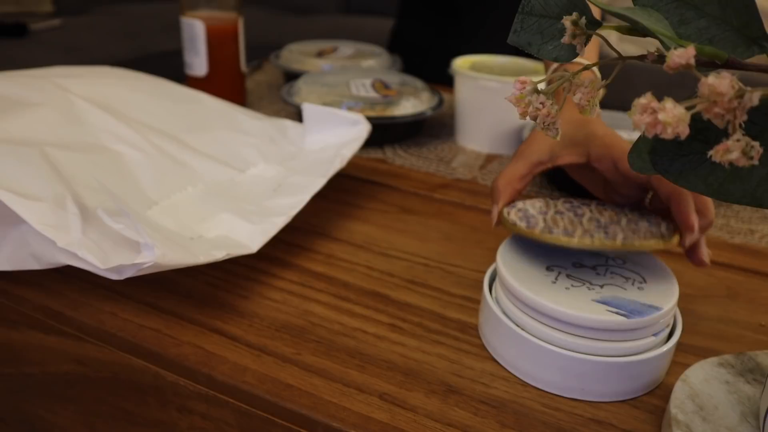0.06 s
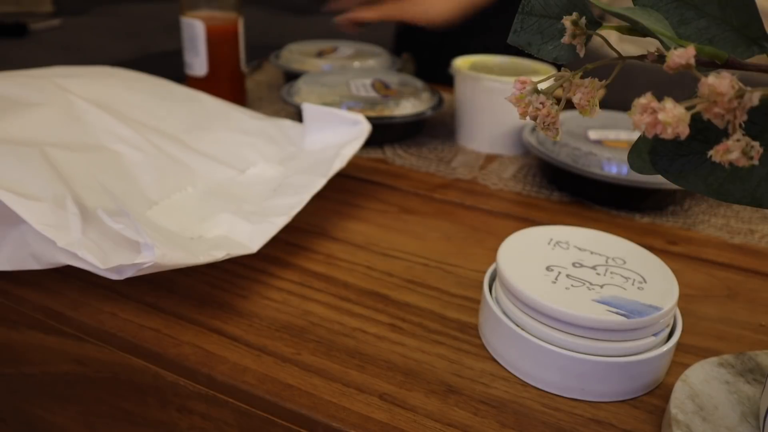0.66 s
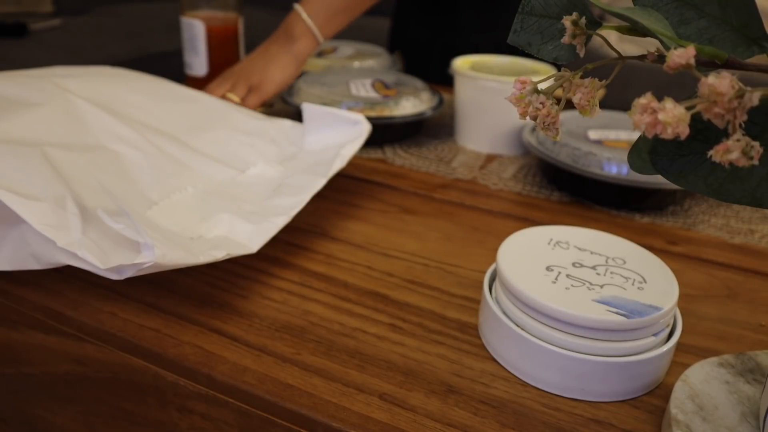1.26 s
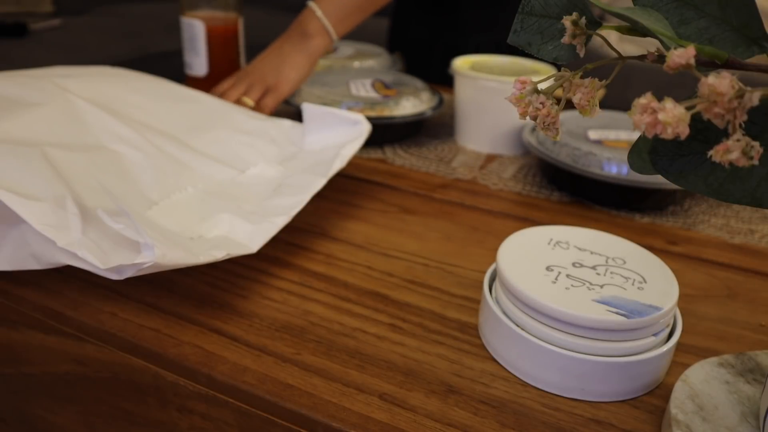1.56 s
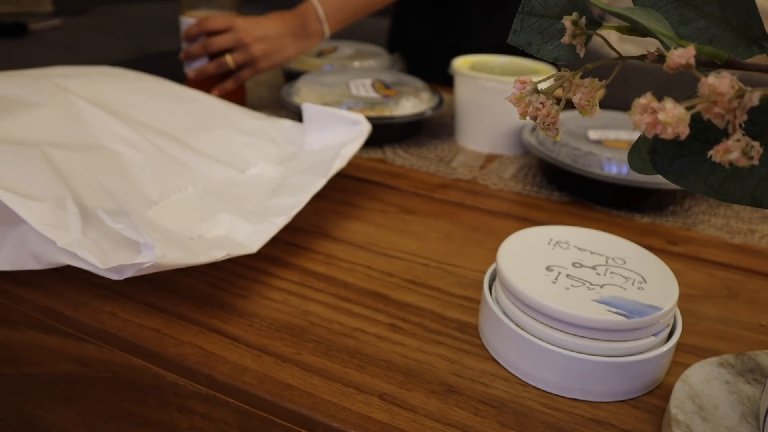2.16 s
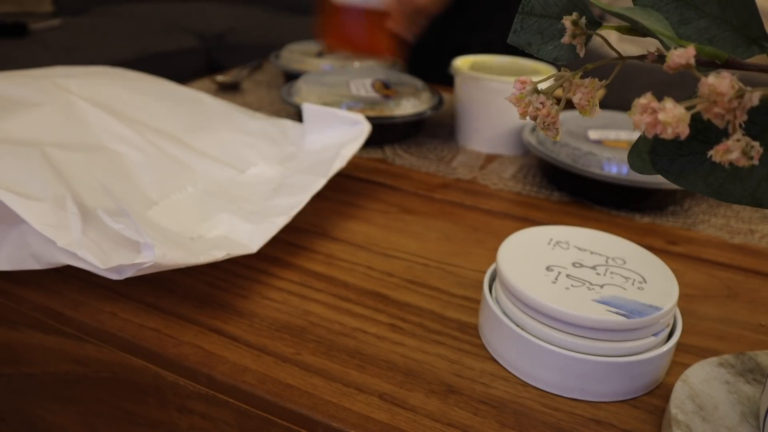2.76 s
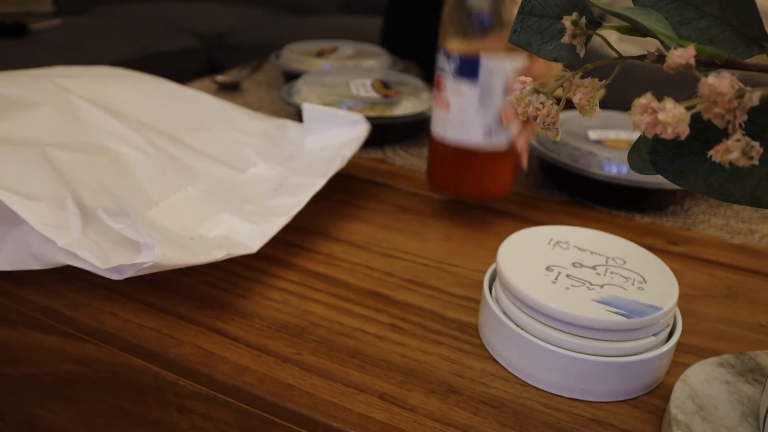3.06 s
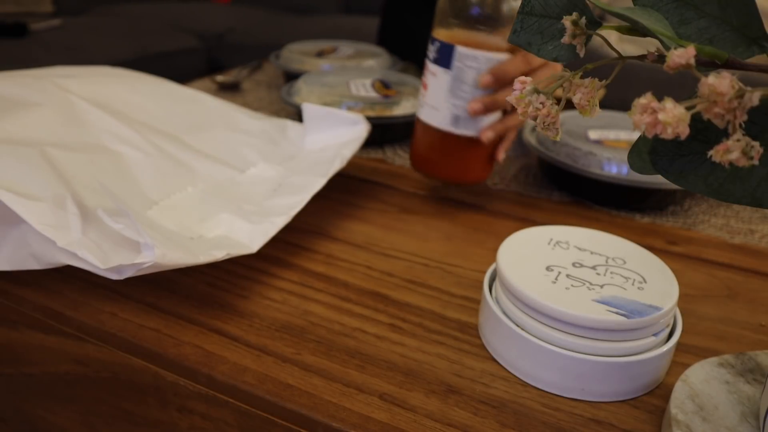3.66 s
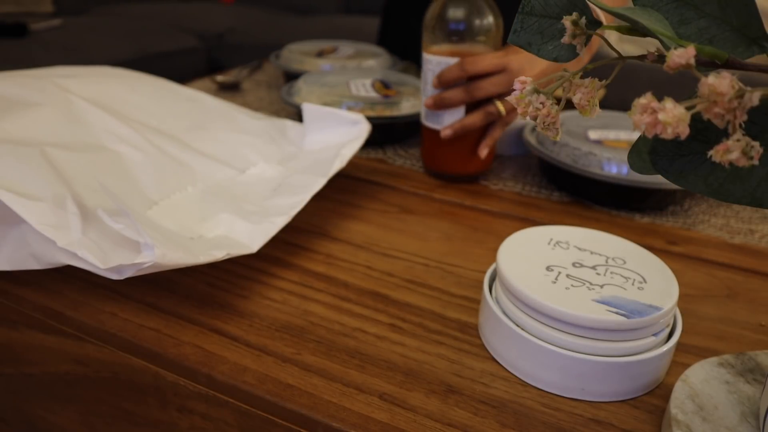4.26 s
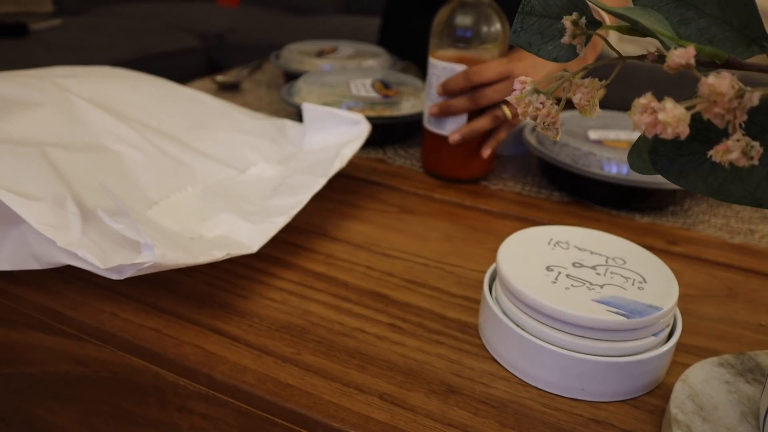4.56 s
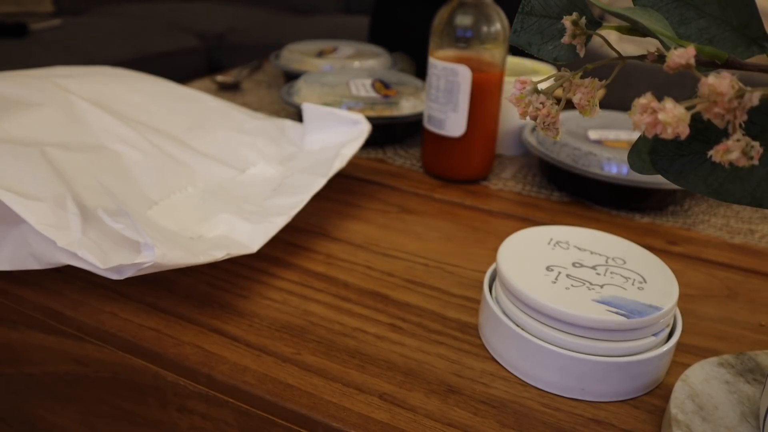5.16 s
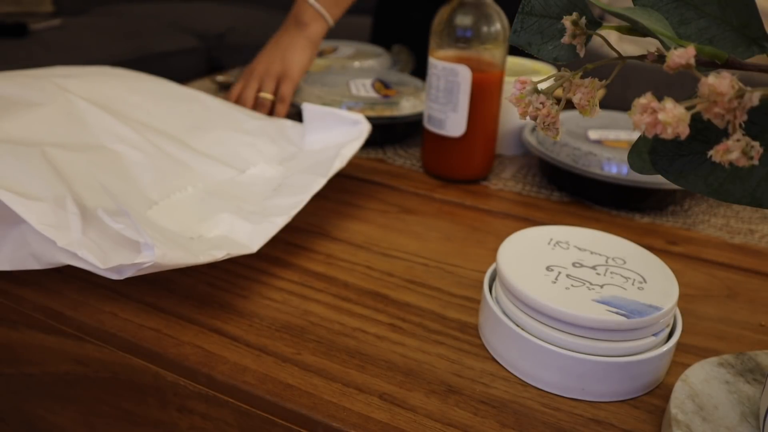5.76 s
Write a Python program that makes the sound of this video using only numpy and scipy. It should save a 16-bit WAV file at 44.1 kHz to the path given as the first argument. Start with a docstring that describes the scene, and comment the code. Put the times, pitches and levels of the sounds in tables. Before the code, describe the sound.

In a quiet room, a ceramic lid clinks and rings briefly, taps a dish, then scrapes and lands on a wooden table with a hard clack. After a pause, a full glass bottle knocks loudly on the bare wood. It is then set on a woven mat with a dull thud and rocks once. Faint finger and clothing rustles follow. The microphone is close, with low hum and hiss underneath.

```python
"""Wooden table, quiet room. A ceramic lid clinks and rings (1.15 s), then taps a dish. Crockery is
shoved, the lid's rim scrapes, and the lid lands hard (1.64 s). A full glass bottle is knocked onto
the bare wood (3.22 s), then set on a woven mat (4.36 s), where it rocks once. Fingers slide off the
glass; clothes rustle. The room answers every blow; the two hard knocks overload the recorder and
its limiter ducks. Rumble, hum and hiss throughout."""
import sys
import numpy as np
from scipy import signal
from scipy.fft import rfft, irfft
from scipy.io import wavfile
from scipy.ndimage import uniform_filter1d

SR = 44100
rng = np.random.default_rng(int(sys.argv[2]) if len(sys.argv) > 2 else 0)


def store_wav(level_fs):
    """Save 16-bit WAV to argv[1]."""
    pcm = np.round(np.clip(np.atleast_2d(level_fs), -1, 1) * 32767)
    wavfile.write(sys.argv[1], SR, pcm.T.astype(np.int16))


N = 256220

# (time [s], level [dB], hardness [Hz])
BOTTLE_BLOWS = [(3.2169, -5.5, 16000)]
# (frequency [Hz], density [dB])
BOTTLE_BURST = [(15, -86), (70, -27), (130, -7.5), (180, -7), (320, -4), (470, -3), (640, 3), (770, -4),
                (930, -16), (1200, -16.5), (1600, -20), (2500, -19.5), (3400, -31.5), (4200, -44.5),
                (5500, -51.5), (8500, -42), (14000, -89.5)]
# (frequency [Hz], level [dB], t60 [s])
KNOCK_AND_ROOM_MODES = [(181.2, -8, 0.52), (248, -11.5, 0.42), (320, -14, 0.45), (335, -8, .035),
                        (400, -21, 0.49), (489, -19, 0.59), (607, -21, 0.77), (645, -0.5, .025),
                        (660, -24.5, 0.85), (728, -23.5, 0.64), (1000, -8.5, .035), (5400, -27.5, .008),
                        (8500, -15.5, .008)]


def bottle_on_wood():
    """Glass knocks on bare wood and sets the room's low resonances booming; the lowest builds up."""
    rise_s = 0.05
    swell = 1 - np.exp(-np.arange(SR) / SR / rise_s)
    return struck(BOTTLE_BLOWS, BOTTLE_BURST, KNOCK_AND_ROOM_MODES, chatter_t60_s=0.016, chatter_db=4,
                  room_db=1, build_s=0.024, lag_ms=0.062, tick=snap(db=-9, hz=1650),
                  lowest_gain=swell, highpass_hz=130)


# (time [s], level [dB], hardness [Hz], sink time [s], glass tick [dB])
MAT_BLOWS = [(4.3560, -11, 430, .0098, -25), (4.5782, -19.5, 307, 0.00124, -46)]
# (frequency [Hz], density [dB])
MAT_BURST = [(15, -52), (50, -9), (90, -9), (150, -5), (250, 4.5), (340, -0.5), (420, -1), (530, 0),
             (780, -4), (1400, -8), (2200, -21), (3100, -24), (4500, -52), (12000, -54)]
# (frequency [Hz], level [dB], t60 [s])
MAT_PARTIALS = [(92.2, -7, 0.22), (128.7, -9, 0.23), (180.4, -2, 0.2), (238, -8.5, 0.3), (263.7, -5, 0.19),
                (318, -14.5, 0.37)]


def bottle_on_mat(fibres=6, weave_s=0.009, weave_db=-33.5, glass_hz=6000, bounce_s=0.00245):
    """Soft thuds: the fibres crunch as they give, the glass bottoms out and rebounds once."""
    rows = []
    for s, db, hard_hz, sink_s, tick_db in MAT_BLOWS:
        rows.append((s, db, hard_hz))
        for k, jitter in enumerate(rng.random(fibres)):
            rows.append((s + weave_s * (k + jitter) / fibres, db + weave_db, glass_hz))
        rows += [(s + sink_s, tick_db, glass_hz), (s + sink_s + bounce_s, tick_db - 4.5, glass_hz)]
    return struck(rows, MAT_BURST, MAT_PARTIALS, chatter_t60_s=0.051, chatter_db=-5.5,
                  room_db=-3, build_s=0.004, lag_ms=0.04, opposed=False, highpass_hz=80)


# (time [s], level [dB], hardness [Hz])
LANDING_BLOWS = [(1.5082, -39, 6000), (1.634, -31, 4000), (1.6376, -11, 22000), (1.6412, -26.5, 9000)]
# (frequency [Hz], density [dB])
TABLE_BURST = [(15, -67.5), (70, -39.5), (150, -14), (300, -7.5), (450, -4), (620, -1), (900, 1.5),
               (1250, -0.5), (1600, -1), (2100, 0), (2700, -10), (4000, -22), (5500, -35.5), (8500, -32.5),
               (14000, -45.5)]
# (frequency [Hz], level [dB], t60 [s])
TABLE_PARTIALS = [(260, -12.5, 0.03), (388.5, -8.5, 0.074), (584, -21.5, 0.084), (1070, -11, .14),
                  (1181, -13, 0.074), (1395, -1.5, 0.025), (1735, -7.5, 0.083), (2010, 2, 0.038),
                  (2234, -9.5, 0.042)]


def crockery_on_table():
    """The wood takes a shove, then the dead clack of the lid."""
    return struck(shoves() + LANDING_BLOWS, TABLE_BURST, TABLE_PARTIALS, chatter_t60_s=0.017,
                  chatter_db=5, room_db=2, build_s=0.0019, lag_ms=0.038, tick=snap(db=-59, hz=2400))


# (time [s], level [dB], length [s])
SHOVE_RUNS = [(1.488, -10.5, 0.066)]


def shoves(gap_s=0.007, jitter_s=0.00209, rise_s=0.013, fade_db=-15.5, hard_hz=370):
    """Stick-slip of crockery: soft, uneven blows that swell and fade."""
    rows = []
    for s, db, length_s in SHOVE_RUNS:
        t = np.arange(0, length_s, gap_s)
        swell_db = 20 * np.log10(1 - np.exp(-(t + gap_s) / rise_s))
        levels_db = db + swell_db + fade_db * t / length_s
        times_s = s + t + jitter_s * rng.standard_normal(len(t))
        rows += [(at, level, hard_hz) for at, level in zip(times_s, levels_db)]
    return rows


# (time [s], level [dB], hardness [Hz])
LID_BLOWS = [(1.1501, -24.5, 16700)]
# (frequency [Hz], density [dB])
LID_BURST = [(15, -59.5), (70, -5), (170, -4), (260, -7.5), (370, 0.5), (540, 4), (800, -10), (1400, 3),
             (2000, -2.5), (2800, -10), (4000, -30), (5200, -19), (6200, -21.5), (9000, -21),
             (11500, -38.5), (14000, -77.5)]
# (frequency [Hz], level [dB], t60 [s])
LID_PARTIALS = [(1942.7, 2.5, .85), (1962.3, -4, .76), (2982, -13, .3), (4925, -22, .27),
                (4963, -20.5, .35), (5380, -19.5, .25), (7176, -11, .16), (8148, -22, .17),
                (8484, -25, .16), (8958, -24, .14), (9148, -17.5, .13), (9680, -27, .14), (10410, -19, .12),
                (11130, -20, .15), (12550, -36, .15)]


def lid_clink():
    """The lid rings freely; its two lowest partials beat."""
    return struck(LID_BLOWS, LID_BURST, LID_PARTIALS, chatter_t60_s=0.01, chatter_db=2,
                  room_db=6, build_s=0.01, lag_ms=-0.038)


# (time [s], level [dB], hardness [Hz])
DISH_BLOWS = [(1.2160, -40, 6980), (1.2899, -20, 16400), (1.2978, -31.5, 13800)]
# (frequency [Hz], density [dB])
DISH_BURST = [(15, -55), (70, -34), (150, -3.5), (450, -5), (800, -12), (1150, -2.5), (1480, 9.5),
              (1800, -10.5), (2400, -4.5), (3400, -3.5), (4000, -26.5), (6000, -16), (9000, -31),
              (14000, -44)]
# (frequency [Hz], level [dB], t60 [s])
DISH_PARTIALS = [(1186, -21.5, 0.34), (1395, -9, 0.15), (1510, -16.5, 0.174), (2270, -34, 0.11),
                 (3290, -19, 0.14), (5100, -40, .25), (7100, -43, .13), (8840, -37.5, 0.28),
                 (9150, -36, .18), (9700, -43, .15)]


def dish_taps():
    """A dish rings briefly under the lid's taps."""
    return struck(DISH_BLOWS, DISH_BURST, DISH_PARTIALS, chatter_t60_s=0.019, chatter_db=4.5,
                  room_db=-2, build_s=0.0056, lag_ms=0.04)


# (time [s], level [dB], length [s])
RIM_DRAGS = [(1.558, -47.5, 0.015), (1.613, -41, .011)]
# (frequency [Hz], density [dB])
RIM_BURST = [(15, -60), (400, -2), (1000, -10), (1600, 2.5), (2300, 0.5), (3100, -6.5), (4000, -22.5),
             (5500, -24), (8000, -28), (13000, -45)]
# (frequency [Hz], level [dB], t60 [s])
RIM_PARTIALS = [(1900, -4.5, .035), (3040, -7, 0.035)]


def rim_scrapes(gap_s=0.0022, ends_db=2.5, spread_db=9.5, hard_hz=14000):
    """The gripped lid's rim catches on tiny bumps, a little harder at both ends of a drag."""
    rows = []
    for s, db, length_s in RIM_DRAGS:
        grid = np.arange(0, 1, gap_s / length_s)
        jitter, weakness = rng.random((len(grid), 2)).T
        progress = grid + jitter * gap_s / length_s
        levels_db = db + ends_db * (2 * progress - 1) ** 2 - spread_db * weakness
        rows += [(s + u * length_s, level, hard_hz) for u, level in zip(progress, levels_db)]
    return struck(rows, RIM_BURST, RIM_PARTIALS, chatter_t60_s=0.014, chatter_db=15,
                  room_db=5.5, build_s=0.0059, lag_ms=0.02)


def struck(rows, colour, partials, chatter_t60_s, chatter_db, room_db, build_s, lag_ms,
           tick=0, lowest_gain=1, opposed=True, highpass_hz=72):
    """Each blow excites a burst of crowded, damped modes, clear partials and the room."""
    t = np.arange(SR) / SR
    sign = -1 if opposed else 1  # neighbouring modes alternate, unless the push is broad
    lowest, *upper = [sign ** k * amp(db - 60 * t / t60_s) * np.sin(2 * np.pi * hz * t)
                      for k, (hz, db, t60_s) in enumerate(partials)]
    ring = np.sqrt(200 / SR) * (lowest * lowest_gain + sum(upper))
    # vibration running to and fro in the wood
    chatter = amp(chatter_db) * unit_energy(rng.standard_normal(SR) * amp(-60 * t / chatter_t60_s))
    chatter[0] += 1  # first push
    burst = unit_energy(signal.fftconvolve(flatten(chatter, 150), click(colour)))[:SR]
    force = blows(rows, highpass_hz)
    direct = signal.oaconvolve(force, burst + ring + tick)[:N]
    room_send = signal.oaconvolve(force, burst + amp(-14) * ring)[:N]
    time_s = np.arange(N) / SR
    left = np.interp(time_s - lag_ms / 1000, time_s, direct)  # off-centre source
    return np.array([left, direct]) + amp(room_db) * room(room_send, build_s)


def blows(rows, highpass_hz):
    """Force pulses, rolling off above their hardness; small objects radiate little bass."""
    force, t = np.zeros(N), np.arange(1, 1025) / SR
    for s, db, hard_hz in rows:
        pulse = t ** 3 * np.exp(-2 * np.pi * hard_hz * t)
        add(force, s, amp(db) * pulse / pulse.sum())
    highpass = signal.butter(4, highpass_hz, "high", fs=SR, output="sos")
    return signal.sosfilt(highpass, force) * np.sqrt(SR / 100)


def snap(db, hz):
    """Air puff from a hard object stopped dead."""
    u = 2 * np.pi * hz * np.arange(SR) / SR
    return amp(db) * unit_energy(np.gradient(u ** 3 * np.exp(-u)))


# (time [s], level [dB], length [s])
FINGER_SLIDES = [(4.72, -68.5, 0.058), (4.8, -57.5, 0.059)]
# (frequency [Hz], density [dB])
FINGER_SPECTRUM = [(600, -35), (1800, 9.5), (3500, -16), (5200, -3.5), (9000, -10), (13000, -41)]


def fingers():
    """Skin brushes the bottle as the hand lets go."""
    out = np.zeros((2, N))
    for s, db, length_s in FINGER_SLIDES:
        u = np.linspace(0, 1, round(length_s * SR))
        friction = np.array([noise(FINGER_SPECTRUM, len(u)) for _ in range(2)])
        add(out, s, amp(db) * unit_rms(np.sqrt(u) * (1 - u)) * friction)
    return out


# (frequency [Hz], density [dB])
CLOTH_SPECTRUM = [(100, -31), (500, 0.5), (1000, 3.5), (1600, 1), (2400, -3.5), (3500, -15), (8000, -36),
                  (14000, -70)]


def rustle(start_s=5.22, length_s=0.48, level_db=-61.5, uneven_db=2.5):
    """Clothes brush softly as the arm reaches across the table."""
    u, direct = np.linspace(0, 1, round(length_s * SR)), np.zeros(N)
    folds = amp(uneven_db * noise([(1, -6.5), (30, -5), (120, -63.5)], len(u)))
    envelope = unit_rms(u ** 2 * (1 - u) ** 4 * folds)
    add(direct, start_s, amp(level_db) * envelope * noise(CLOTH_SPECTRUM, len(u)))
    return direct + room(direct, build_s=0.01)


# (frequency [Hz], t60 [s])
ROOM_DECAY = [(100, 0.85), (250, 0.53), (450, 0.81), (680, 0.54), (1100, 0.68), (3000, 0.62), (5500, 0.52),
              (10000, 0.035)]
# (frequency [Hz], gain [dB])
ROOM_GAIN = [(60, 10.5), (200, 2.5), (600, -1), (2000, -4.5), (4000, -1), (6000, -8), (9000, -23),
             (13000, -31)]
# (frequency [Hz], left-right correlation [-1..1])
ROOM_CORRELATION = [(100, 1), (300, 1), (600, 0.94), (1000, 0.75), (1800, 0.64), (3000, -0.12),
                    (6000, 0.074)]


def room(x, build_s):
    """Diffuse tail, swelling after the direct sound; bass alike in both ears."""
    mid, side = rfft(echoes(ROOM_DECAY)), rfft(echoes(ROOM_DECAY))
    hz = np.linspace(0, SR / 2, len(mid))
    correlation = curve(ROOM_CORRELATION, hz)
    mid *= np.sqrt((1 + correlation) / 2)
    side *= np.sqrt((1 - correlation) / 2)
    tail = irfft(np.array([mid + side, mid - side]) * amp(curve(ROOM_GAIN, hz)))
    t = np.arange(tail.shape[1]) / SR
    tail *= (1 - np.exp(-t / build_s)) * np.minimum(10 * (t[-1] - t), 1)
    return signal.fftconvolve(x[None], tail, axes=1)[:, :N]


def echoes(decay, size=32768):
    """Echo cloud: equal energy in all bands, each with its own t60."""
    hz, t, bands = signal.stft(rng.standard_normal(size), SR, nperseg=256)
    bands *= amp(-60 * t / curve(decay, hz)[:, None])
    cloud = signal.istft(bands, SR, nperseg=256)[1][:size]
    return flatten(cloud, 70)


# (frequency [Hz], level [dB])
HUM_TONES = [(58, -64), (119, -62)]
# (frequency [Hz], density [dB])
AIR_MID_SPECTRUM = [(15, -13.5), (30, -12), (55, -0.5), (85, 0.5), (120, -8), (170, -8), (350, -13),
                    (700, -18.5), (1500, -23), (3000, -29), (6000, -38), (10000, -47), (13000, -55.5),
                    (15000, -66.5)]
AIR_SIDE_SPECTRUM = [(20, -29), (100, -2.5), (350, 3), (700, 0), (1500, -3.5), (3000, -9), (6000, -17.5),
                     (10000, -28.5), (13000, -34), (15000, -57)]


def background(mid_db=-52, side_db=-55.5):
    """Room rumble, faint wavering hum, wide hiss."""
    t, hum = np.arange(N) / SR, np.zeros(N)
    for hz, db in HUM_TONES:
        waver_rad = noise([(1, -2.5), (4, -14.5), (20, -93.5)], N)
        hum += amp(db) * np.sqrt(2) * np.sin(2 * np.pi * hz * t + waver_rad)
    mid = amp(mid_db) * noise(AIR_MID_SPECTRUM, N) + hum
    side = amp(side_db) * noise(AIR_SIDE_SPECTRUM, N)
    return np.array([mid + side, mid - side])


def amp(db):
    return 10 ** (np.asarray(db) / 20)


def unit_rms(x):
    return x / np.sqrt(np.mean(x ** 2) + 1e-20)


def unit_energy(x):
    return x / np.linalg.norm(x)


def curve(points, hz):
    """Interpolation over log frequency."""
    points_hz, values = np.transpose(points)
    return np.interp(np.log(hz + 1), np.log(points_hz + 1), values)


def add(mix, start_s, sound):
    """Mixes a sound in, in place."""
    part = mix[..., round(start_s * SR):][..., :sound.shape[-1]]
    part += sound[..., :part.shape[-1]]


def noise(colour, size):
    """Shaped noise, rms one."""
    gain = amp(curve(colour, np.fft.rfftfreq(size, 1 / SR)))
    return unit_rms(irfft(rfft(rng.standard_normal(size)) * gain, size))


def click(colour, size=4096):
    """Minimum-phase pulse of the given spectrum."""
    log_gain = np.log(amp(curve(colour, abs(np.fft.fftfreq(size, 1 / SR)))))
    spectrum = np.exp(np.conj(signal.hilbert(log_gain)))
    return unit_energy(np.fft.ifft(spectrum).real[:size // 2])


def flatten(x, width_hz):
    """Levels broad spectral peaks and dips; fine ripple stays."""
    spectrum = rfft(x, 2 * len(x))
    power = uniform_filter1d(abs(spectrum) ** 2, size=int(2 * len(x) * width_hz / SR) + 1)
    return unit_energy(irfft(spectrum / np.sqrt(abs(power) + 1e-12))[:len(x)])


def scene():
    """Stereo sum of all sources."""
    crockery = lid_clink() + dish_taps() + crockery_on_table() + rim_scrapes()
    return crockery + bottle_on_wood() + bottle_on_mat() + fingers() + rustle() + background()


def record(dry, limit_db=-10, recover_db_per_s=65, attack_s=0.003, depth=0.21, lowpass_hz=16000):
    """A limiter ducks after each hard knock, too late for the first peaks, which flatten."""
    power = uniform_filter1d((dry ** 2).mean(0), size=180)
    level_db = 10 * np.log10(abs(power) + 1e-12)
    fall_db = np.arange(N) * recover_db_per_s / SR
    held_db = np.maximum.accumulate(level_db + fall_db) - fall_db
    over_db = np.maximum(held_db - limit_db, 0)
    pole = np.exp(-1 / (attack_s * SR))
    ducked = dry / amp(depth * signal.lfilter([1 - pole], [1, -pole], over_db))
    clipped = ducked / (1 + ducked ** 6) ** (1 / 6)
    lowpass = signal.firwin(255, lowpass_hz, window=("kaiser", 9), fs=SR)
    return signal.oaconvolve(clipped, lowpass[None], "same")


dry = scene()
out = record(dry)
store_wav(out)
```